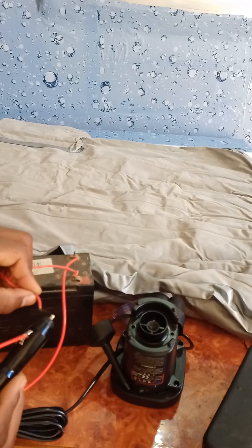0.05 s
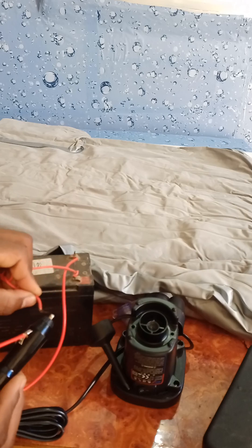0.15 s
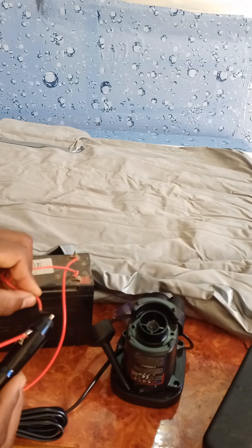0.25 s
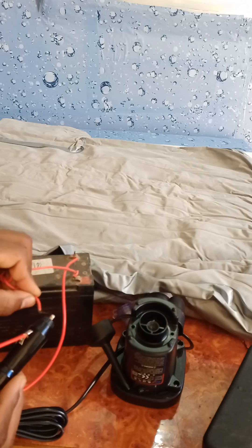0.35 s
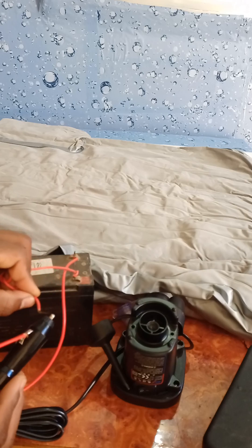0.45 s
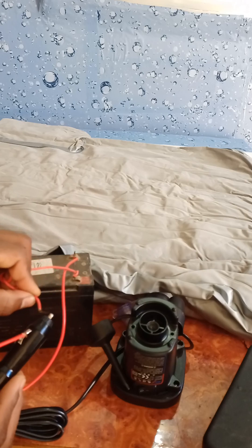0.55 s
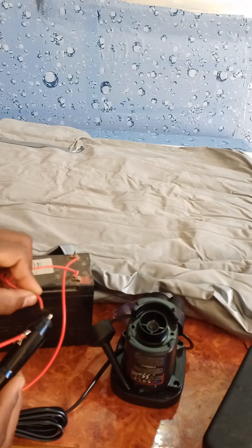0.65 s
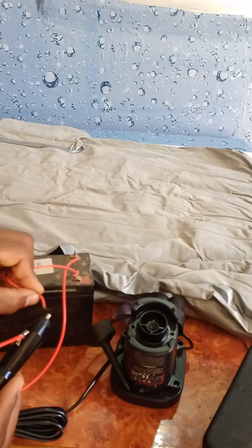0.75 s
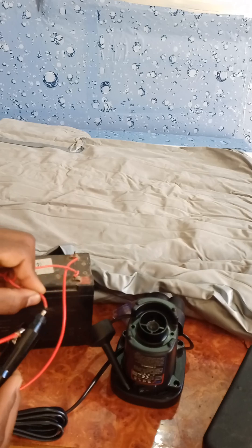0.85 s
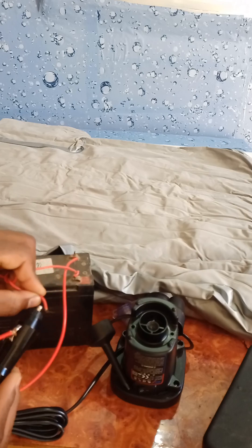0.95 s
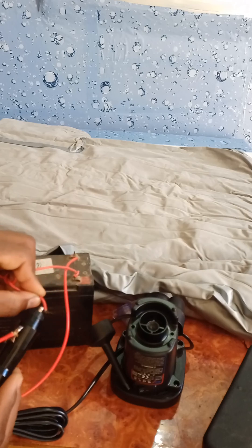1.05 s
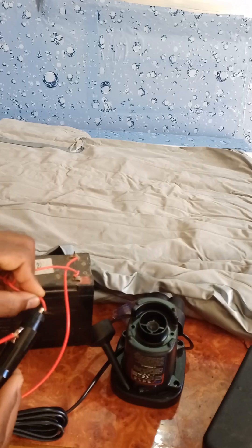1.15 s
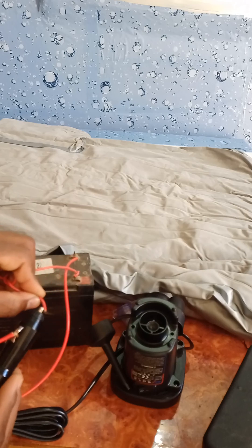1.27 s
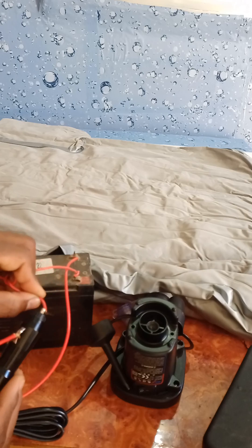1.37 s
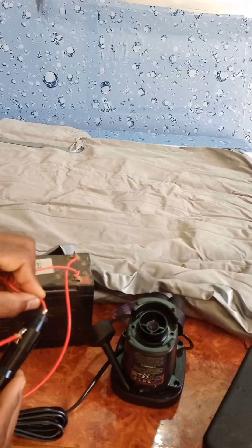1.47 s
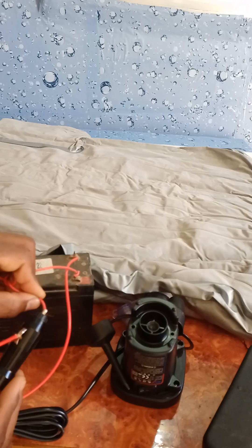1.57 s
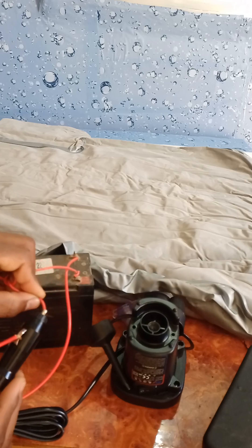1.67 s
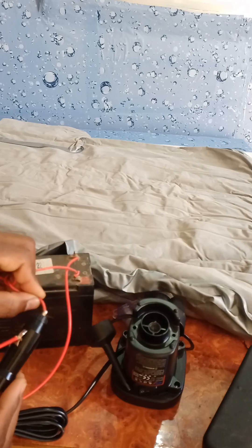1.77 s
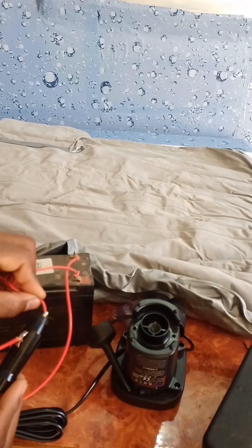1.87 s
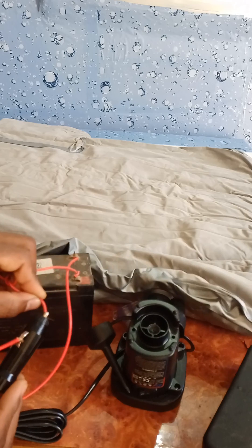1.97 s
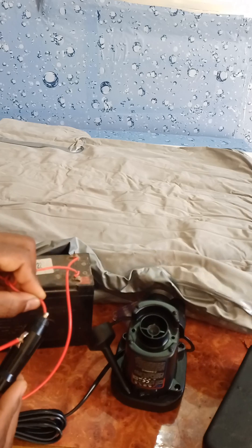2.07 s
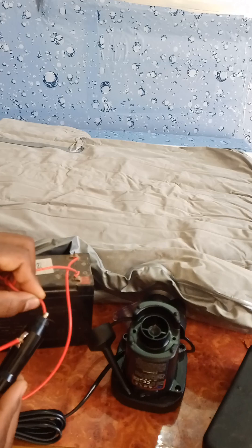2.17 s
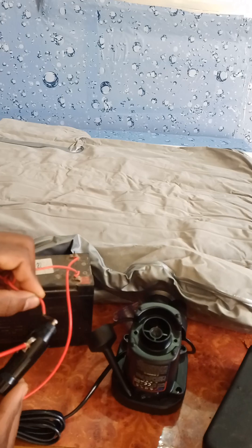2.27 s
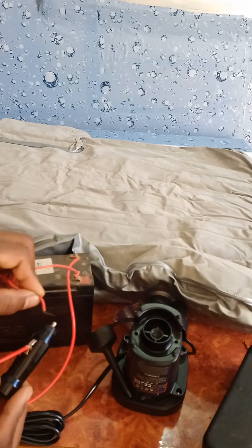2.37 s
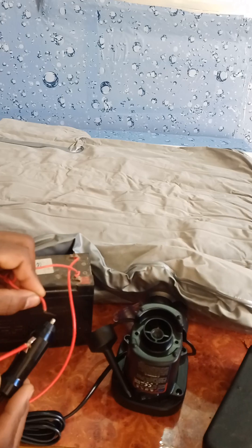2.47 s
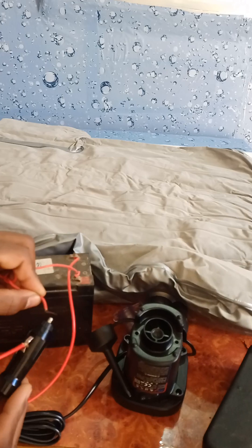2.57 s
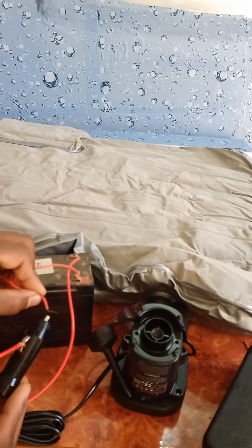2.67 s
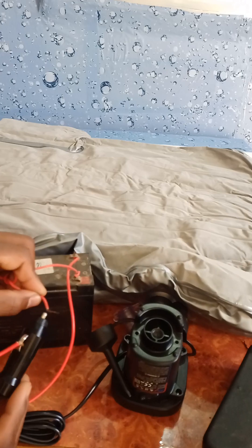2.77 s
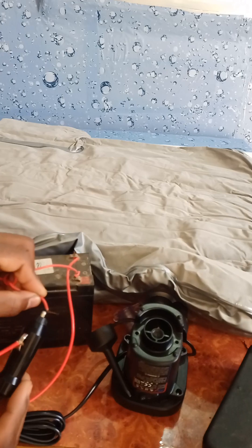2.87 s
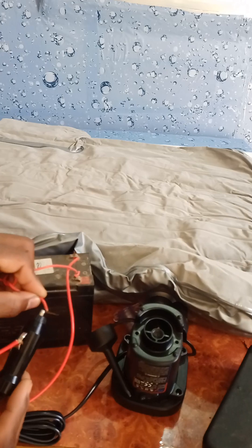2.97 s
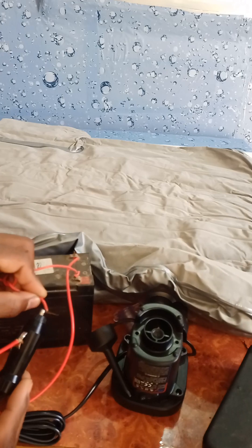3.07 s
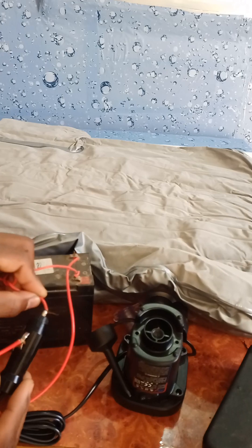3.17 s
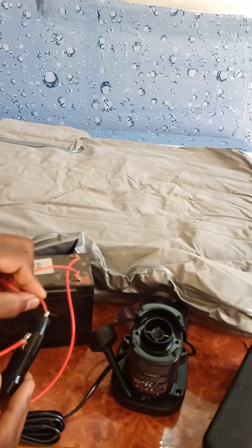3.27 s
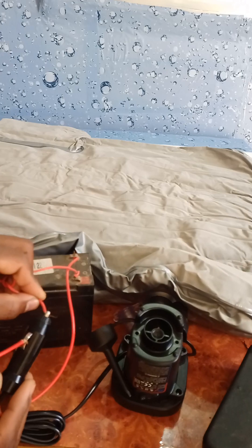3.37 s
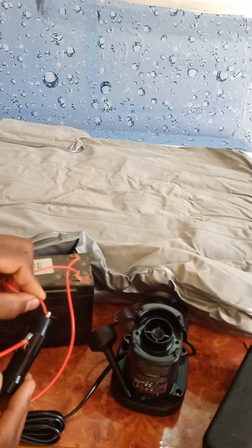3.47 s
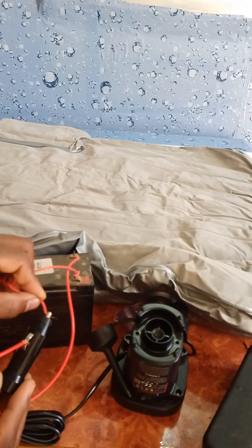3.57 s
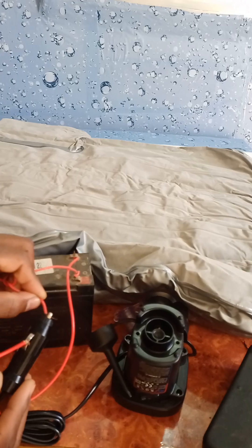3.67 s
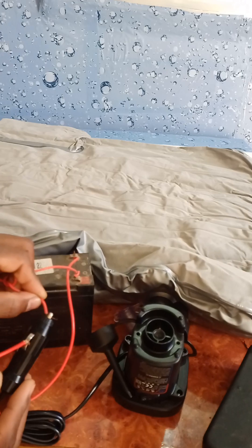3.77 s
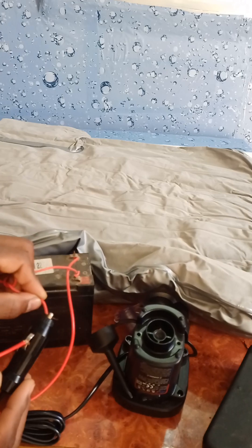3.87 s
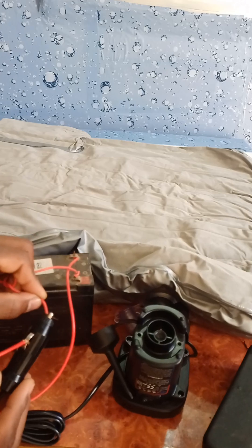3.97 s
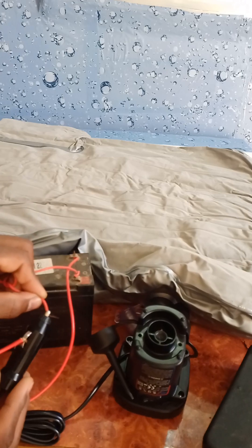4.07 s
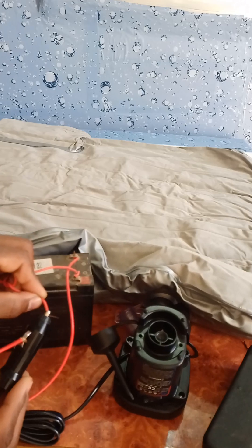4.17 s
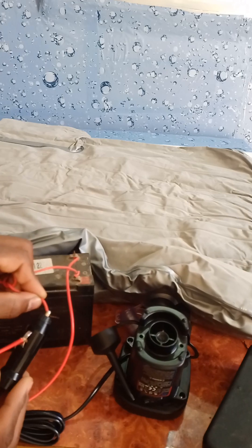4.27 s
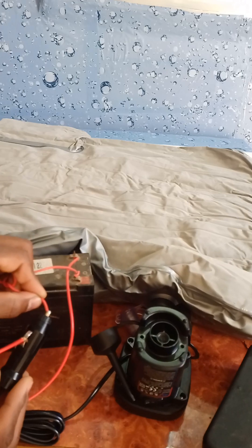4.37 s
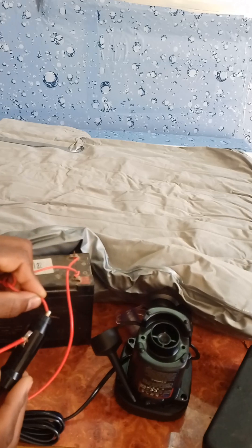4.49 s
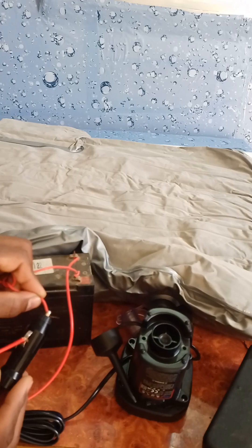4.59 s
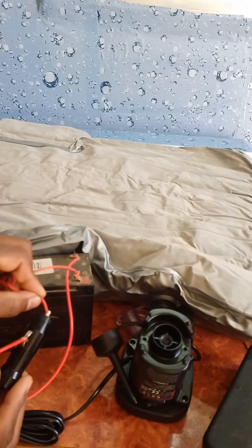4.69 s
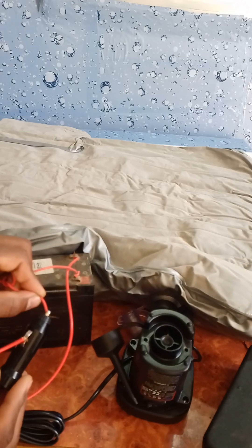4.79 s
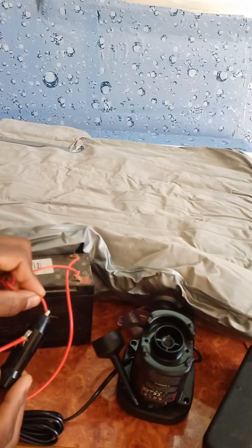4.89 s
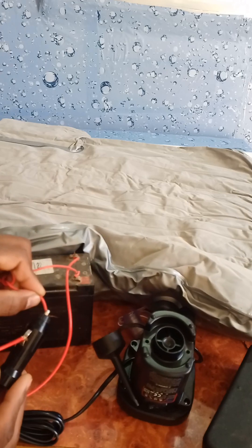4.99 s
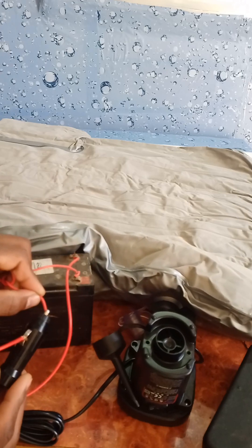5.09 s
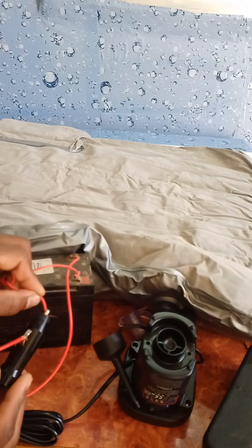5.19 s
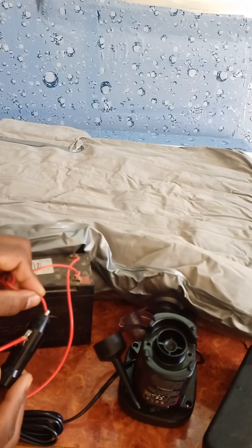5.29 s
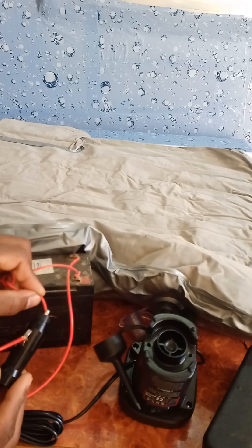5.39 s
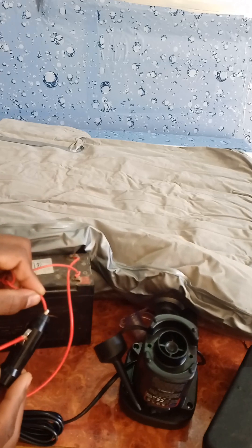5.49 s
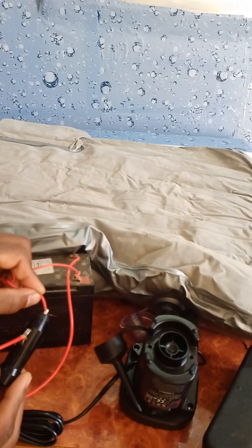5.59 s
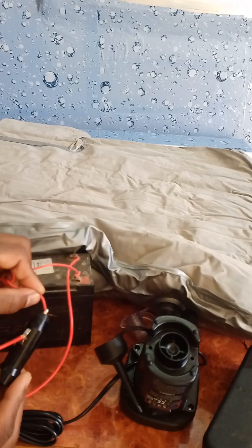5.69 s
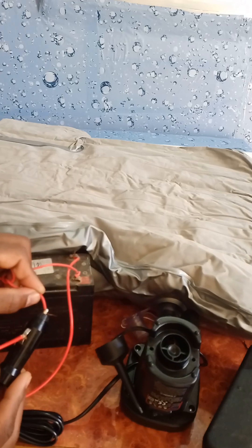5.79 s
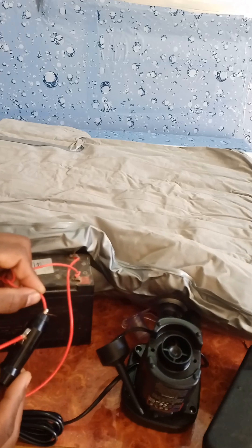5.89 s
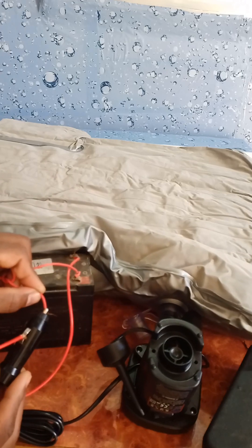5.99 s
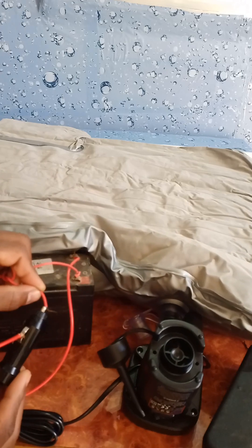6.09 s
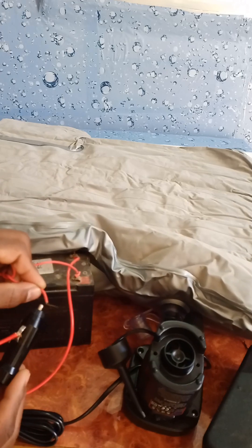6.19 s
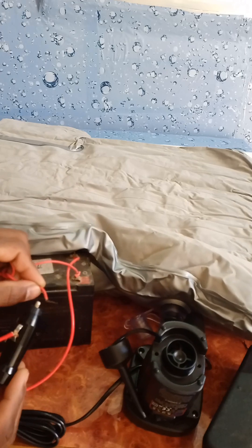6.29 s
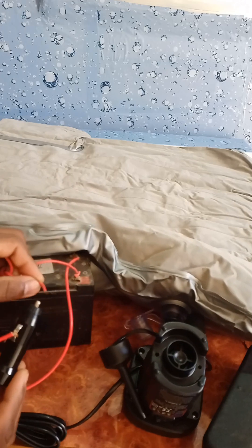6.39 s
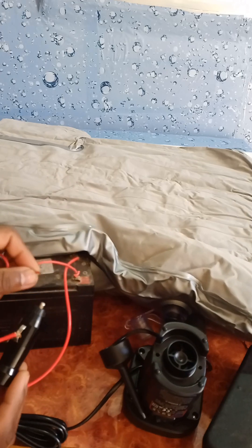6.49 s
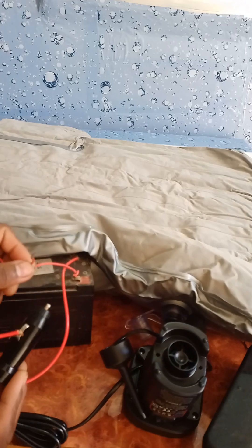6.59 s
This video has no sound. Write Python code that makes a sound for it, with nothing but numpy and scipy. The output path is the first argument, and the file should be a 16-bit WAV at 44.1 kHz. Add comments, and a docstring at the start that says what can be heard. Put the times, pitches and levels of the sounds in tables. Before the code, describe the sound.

Near-silence with dull handling rustle and a couple of dry clicks, then a compact air pump surges on: rising whine, hissing airflow, brush buzz. Power cuts and the pitch glides down, growing buzzier and quieter, before it climbs again and runs on with slight case vibration. Close phone microphone, modest bedroom reflections, final spin-down just starting.

```python
"""A small battery air pump blows into a mattress in a bedroom, close to a phone.
A wire is held to its plug: the motor spins up, coasts down, spins up again, runs, and coasts once more.
Six impeller blades whine over a noise rush of air; brushes buzz, and the unbalanced shaft shakes and
rattles the case on the table. All the pump's tones are sines locked to one computed shaft angle.
Before the start, filtered noise rustles as hands move the leads, and decaying sines tick from the plug."""
import sys
import numpy as np
from scipy import signal
from scipy.fft import rfft, irfft
from scipy.io import wavfile
from scipy.ndimage import uniform_filter1d

SR = 44100
rng = np.random.default_rng(int(sys.argv[2]) if len(sys.argv) > 2 else 0)


def master_out(mix):
    """Clip the mix to full scale and print it as 16-bit PCM to the path in sys.argv[1]."""
    frames = np.transpose(np.atleast_2d(mix))
    ceiling = np.clip(frames, -1, 1)
    pcm = np.round(ceiling * 32767).astype(np.int16)
    wavfile.write(sys.argv[1], SR, pcm)


N = 292855
TIME = np.arange(N) / SR
BINS_HZ = np.maximum(np.arange(N // 2 + 1) * SR / N, 1)
START_S = 1.46  # the pump first sounds
FULL_SPEED_HZ = 336  # shaft turns a second
POLES = 5  # motor poles
TOP_HZ = 15700  # upper limit of the phone

# Tone of the air stream. Each row: frequency in Hz, relative level in dB per Hz.
AIR_COLOUR = [(50.0, -26.5), (110.0, -22.5), (190.0, -9.5), (300.0, -6.5), (560.0, 5), (780.0, -2.5),
              (1000.0, 4.5), (1650.0, 2.5), (2250.0, -7.5), (3500.0, -16.5), (5200.0, -14.5), (8300.0, -23),
              (11000.0, -21), (15500.0, -42.5)]
# Resonances of the impeller housing and intake. Each row: centre in Hz, width in Hz, lift in dB.
HOUSING_RESONANCES = [(2942, 505, 12), (4143, 940, 9), (4687, 290, 12.5), (6080, 1360, 12.5),
                      (7400, 950, 9), (9130, 810, 9.5), (9924, 440, 7)]


def undb(db):
    """Decibels to gain."""
    return 10 ** (np.asarray(db) / 20)


def curve(rows, axis=1):
    """One column of a table, joined by straight lines in time."""
    rows = np.array(rows)
    return np.interp(TIME, rows[:, 0], rows[:, axis])


def colour(points, hz):
    """Level in dB of a spectrum at the given frequencies, joined along log frequency."""
    point_hz, db = np.transpose(points)
    return np.interp(np.log(hz), np.log(point_hz), db)


def lift_db(hz, resonances):
    """How many dB a set of bell-shaped resonances lifts a frequency."""
    return sum(db * np.exp(-(2 * (hz - centre) / width) ** 2) for centre, width, db in resonances)


def noise(spectrum_db):
    """Noise of a given spectrum, rms 1."""
    x = irfft(rfft(rng.standard_normal(N)) * undb(spectrum_db), N)
    return x / x.std()


def split(x, hz, order=6):
    """The parts of a sound below and above a frequency, each with rms 1."""
    low = irfft(rfft(x) / (1 + (BINS_HZ / hz) ** order), N)
    high = x - low
    return low / low.std(), high / high.std()


def walk(rate_hz):
    """Smooth random movement: noise dulled above the given rate, spread 1."""
    return noise(-20 * np.log10(1 + (BINS_HZ / rate_hz) ** 4))


def line(angle, multiple, db, waver_db):
    """One multiple of the shaft rate; turbulence makes its level waver."""
    level = np.sqrt(2) * undb(db + waver_db * walk(35.7))
    return level * np.sin(multiple * angle + rng.uniform(0, 2 * np.pi))


def quiet_room(level_db=-72):
    """Steady coloured noise is the bed of the quiet room."""
    # Each row: frequency in Hz, relative level in dB per Hz.
    quiet_colour = [(25, -12), (100, 18), (200, 4), (380, 4), (780, -1.5), (2500, -7.5), (15000, -21)]
    return undb(level_db) * noise(colour(quiet_colour, BINS_HZ))


def hands(rub_db=-6.5, rustle_db=-19.0, grain_db=1.0, hold_db=-68.5, fade_s=0.08):
    """Dull rubbing and a faint uneven rustle as the leads are brought together."""
    # Tone of skin on leads. Each row: frequency in Hz, relative level in dB per Hz.
    hands_colour = [(40, -26), (190, -14), (360, 2), (470, -9), (700, -22.5), (1450, -25.5), (2900, -34),
                    (6300, -30.5), (14000, -50)]
    # Movements of the leads. Each row: start in seconds (mid-fade), length in seconds, relative level in dB.
    rubs = [(-.05, 0.32, -55), (.81, 0.3, -59), (1.214, 0.35, -61.5)]
    rub, rustle = split(noise(colour(hands_colour, BINS_HZ)), 2200)
    moves = 0
    for at, length, db in rubs:
        nearest_end = np.minimum(TIME - at, at + length - TIME)
        moves = moves + undb(db) * np.clip(nearest_end / fade_s + .5, 0, 1)
    # hands merely holding the leads keep a floor under the rubs
    effort = np.hypot(moves, undb(hold_db)) * (TIME < START_S)
    rustle = rustle * undb(rustle_db + grain_db * walk(120))
    return (undb(rub_db) * rub + rustle) * effort


def ticks(crack=0.82, crack_s=0.005, low_hz=3100, high_hz=10000):
    """Metal touches metal: a short dry scrape rings the plug."""
    # Touches of plug on wire. Each row: start in seconds, peak in dB, brightness in dB an octave.
    touches = [(1.0304, -38.5, -3), (1.083, -43, -15), (1.415, -62, -6), (1.4595, -50, 3)]
    # Ring of the plug. Each row: frequency in Hz, relative level in dB, t60 in seconds.
    plug = [(3480, -9, .018), (5330, 0, 0.0076), (6370, -7, .012), (9600, -10, 0.014)]
    out, t = np.zeros(N), TIME[:SR // 10]
    band = signal.butter(3, [low_hz, min(high_hz, TOP_HZ)], "band", fs=SR, output="sos")
    for at, peak_db, bright_db in touches:
        ring = 0
        for hz, db, t60 in plug:
            tilt_db = bright_db * np.log2(hz / plug[0][0])
            ring = ring + undb(db + tilt_db - 60 * t / t60) * np.sin(2 * np.pi * hz * t)
        scrape = signal.sosfilt(band, rng.standard_normal(len(t))) * np.exp(-t / crack_s)
        tick = (ring + crack * undb(bright_db) * scrape) * np.minimum(t / 0.00077, 1)
        i = int(at * SR)
        out[i:i + len(t)] += undb(peak_db) * tick / np.abs(tick).max()
    return out


def shaft(size=44):
    """Speed (Hz) and pull (0-1): powered, the motor drives towards top speed; drag and friction always brake."""
    # The wire is held to the plug. Each row: on in seconds, off in seconds.
    power_on = [(1.463, 2.368), (3.328, 6.227)]
    # Speed the battery can sustain against the air load. Each row: time in seconds, turns a second in Hz.
    top_speed = [(1.9, 342.0), (2.3, 335.2), (3.8, 339.6), (4.2, 334.6), (4.8, 337.6), (5.0, 339.9)]
    spin_up_s, air_drag_per_turn, friction_hz_per_s = .418, .00417, 56.8
    stall_hz_per_s = 1300  # acceleration that counts as full pull

    def losses(hz):
        """Braking in Hz per second: air drag grows with speed squared, bearing friction is constant."""
        return air_drag_per_turn * hz ** 2 + friction_hz_per_s

    times, hz, speeds = TIME[::size], 0., []
    for t, top in zip(times, curve(top_speed)[::size]):
        powered = any(on <= t < off for on, off in power_on)
        drive = (top - hz) / spin_up_s + losses(top) if powered else 0
        hz = max(0, hz + (drive - losses(hz)) * size / SR)
        speeds.append(hz)
    speed = np.interp(TIME, times, speeds)
    pull = np.clip(np.gradient(speed) * SR / stall_hz_per_s, 0, 1)
    return speed, uniform_filter1d(pull, SR // 50)


def air_stream(angle, speed, pull, rush_db=-26.0, choke_hz=235, rush_power=4.53, hiss_db=-27,
               hiss_power=3.52, idle_db=-22, pull_db=4, scrape_db=-43, scrape_s=0.11,
               crossover_hz=2200, chop=0.062, flutter_db=1.2):
    """A low rush grows until the nozzle chokes; hiss pulses with each turn; the first start adds a scrape."""
    # the air stream slackens as the mattress fills
    rush_fade_db_per_s, hiss_fade_db_per_s = 1.21, 0.83
    air = noise(colour(AIR_COLOUR, BINS_HZ) + lift_db(BINS_HZ, HOUSING_RESONANCES))
    rush, hiss = split(air, crossover_hz)
    pace, age = speed / FULL_SPEED_HZ, np.maximum(TIME - START_S, 0)
    flow = (speed / choke_hz) ** rush_power
    flow = flow / np.hypot(1, flow) * undb(rush_db - rush_fade_db_per_s * age)
    scrape = undb(scrape_db) * (age / scrape_s * np.exp(1 - age / scrape_s)) ** 2
    rush = rush * np.hypot(flow, scrape) * undb(flutter_db * walk(6.9))
    hiss = hiss * np.hypot(pace ** hiss_power, undb(idle_db) * pace)
    hiss = hiss * undb(hiss_db - hiss_fade_db_per_s * age + pull_db * pull + flutter_db * walk(33))
    return rush + hiss * (1 + chop * np.sin(angle))


def motor(angle, speed, pull, power=2.5, waver_db=4.0, torque_db=-25, case_hz=1470, case_width_hz=400,
          onset_hz=150):
    """Motor lines flare as they sweep the housing's resonances; the poles sing while the motor pulls hard."""
    # Low shaft multiples and upper blade harmonics.
    # Each row: multiple of the shaft rate, level in dB at full speed before resonance and waver.
    motor_lines = [(2, -44), (3, -42), (5, -39.5), (14, -61), (17, -56.5), (24, -52), (30, -51.5),
                   (36, -56.5), (42, -69)]
    lines = sum(line(angle, multiple, db + lift_db(multiple * speed, HOUSING_RESONANCES), waver_db)
                for multiple, db in motor_lines)
    off_tune = 2 * (POLES * speed - case_hz) / case_width_hz
    case = np.minimum(speed / onset_hz, 1) ** 2 / np.hypot(1, off_tune) ** 2
    pole_song = np.sqrt(np.abs(pull)) * case * line(angle, POLES, torque_db, waver_db)
    return lines * (speed / FULL_SPEED_HZ) ** power + pole_song


def brushes(angle, speed, pull, buzz_db=-60, pull_db=11, colour_share=0.76, pole_db=10, can_hz=6200,
            can_db=9, onset_hz=70, count=56):
    """Brushes tick over the commutator: shaft multiples, strongest at pole multiples, ring the motor's can."""
    out = 0
    coarse, patch_times = TIME[::64], TIME[::SR // 20]
    for k in range(2 * POLES, count):
        hz = k * speed[::64]
        ring_db = can_db * np.exp(-(8 * (hz / can_hz - 1)) ** 2)
        db = buzz_db + pole_db * (k % POLES == 0) + ring_db + pull_db * pull[::64]
        db = db + lift_db(hz, HOUSING_RESONANCES) / 2
        db = db + colour_share * colour(AIR_COLOUR, np.maximum(hz, 1))
        patchy_db = 4 * np.interp(coarse, patch_times, rng.standard_normal(len(patch_times)))
        gain = undb(db + patchy_db) / (1 + (hz / can_hz) ** 10)
        out = out + np.interp(TIME, coarse, gain) * np.sin(k * angle + rng.uniform(0, 2 * np.pi))
    # the ticking fades more slowly than the air, so it stands out as the motor coasts
    return out * speed / FULL_SPEED_HZ * np.minimum(speed / onset_hz, 1) ** 2


def impeller(angle, speed, whine_db=-0.45, waver_db=1.0, glide_waver_db=3.5, onset_hz=125):
    """Blades passing the outlet whine in three harmonics that flare in its resonances, unsteady when slow."""
    blades = 6
    # Each row: multiple of the blade rate, base level in dB, power of speed.
    whine = [(1, -27, 2.45), (2, -38.6, 0.046), (3, -37.5, 3.06)]
    # Outlet resonances the whine sweeps through. Each row: centre in Hz, width in Hz, lift in dB.
    outlet = [(1235, 285, 6.5), (1663, 140, 7), (2895, 220, 13), (4606, 400, 16), (5350, 150, 3),
              (5940, 410, 10.5)]
    # Slow swells of the whine. Each row: time in seconds, then first, second and third harmonic in dB.
    swells = [(1.68, 9.5, -8.0, -3.5), (2.2, 2.5, 7.0, -1.5), (2.9, 1.5, -18, -7), (3.5, 2.5, -8.5, -1.5),
              (3.95, 3, 1.5, 2.5), (4.35, -4.5, -6.5, -8.5), (4.7, 5.5, -3, -7), (5.05, -3.0, 9.5, 0.5),
              (5.45, -2.5, 15, 5.5), (5.85, -4, 12, 3), (5.97, -0.5, 3, 3.5), (6.2, 1.5, 7, 0.5),
              (6.45, 6.5, -15.5, 0)]
    out, pace = 0, np.maximum(speed, 1) / FULL_SPEED_HZ
    unsteady_db = waver_db + glide_waver_db * np.clip(2 * (1 - pace), 0, 1)
    for column, (harmonic, db, power) in enumerate(whine, 1):
        multiple = blades * harmonic
        level_db = whine_db + db + lift_db(multiple * speed, outlet) + curve(swells, axis=column)
        out = out + pace ** power * line(angle, multiple, level_db, unsteady_db)
    return out * np.minimum(speed / onset_hz, 1) ** 5


def shaking(angle, speed, pull, mount_hz=223, width_hz=45, shake_db=-33, pull_db=-5, slip_hz=170,
            rattle_hz=241, rattle_span_hz=13):
    """Imbalance grows with speed squared, rocks the case once the feet slip, and rattles near resonance."""
    # How firmly the case sits on the table. Each row: time in seconds, lift in dB.
    contact = [(4.8, 8), (4.95, 16), (6.22, 15), (6.42, 7)]
    # Rattle of the case. Each row: multiple of the shaft rate, relative level in dB.
    rattle_lines = [(2, -37), (3, -32.5), (4, -37.5)]
    feet = 1 / (1 + 1j * (BINS_HZ / mount_hz - mount_hz / BINS_HZ) * mount_hz / width_hz) ** 2
    force = (speed / mount_hz) ** 2 * np.minimum(speed / slip_hz, 1) ** 10
    hum = irfft(rfft(force * line(angle, 0.99, shake_db, waver_db=2.0)) * feet, N)
    loose = np.exp(-((speed - rattle_hz) / rattle_span_hz) ** 2)
    rattle = sum(line(angle, multiple, db, waver_db=2.0) for multiple, db in rattle_lines)
    # the case shakes less while the motor pulls
    return (hum + loose * rattle) * undb(curve(contact) + pull_db * pull)


def pump():
    """All the pump's sounds follow one slightly unsteady shaft."""
    speed, pull = shaft()
    speed = speed * (1 + .0003 * walk(30))
    angle = 2 * np.pi * np.cumsum(speed) / SR
    running = np.clip((TIME - START_S) / 0.0091, 0, 1)
    body = motor(angle, speed, pull) + brushes(angle, speed, pull) + shaking(angle, speed, pull)
    return running * (air_stream(angle, speed, pull) + impeller(angle, speed) + body)


def room(x, count=16):
    """Mirror images of the source in walls, floor and ceiling give its echoes."""
    # room size and positions in metres
    room_size, pump_at, phone_at = (3.53, 4.31, 2.74), (1.1, 1.5, .2), (1.18, 1.25, .6)
    sound_speed, wall_reflection, echo_share = 343, .86, .7  # m/s, gain per bounce, overall gain
    n = np.mgrid[-count:count + 1, -count:count + 1, -count:count + 1].reshape(3, -1).T
    images = n * np.array(room_size) + np.where(n % 2, np.subtract(room_size, pump_at), pump_at)
    far, bounces = np.linalg.norm(images - phone_at, axis=1), np.abs(n).sum(axis=1)
    lag = ((far - far.min()) / sound_speed * SR).astype(int)
    size = echo_share * (-wall_reflection) ** bounces * far.min() / far
    # direct sound is left out; the mattress swallows the nearest bounce
    echoes = np.bincount(lag, size * (far > 2 * far.min()))
    return signal.fftconvolve(x, echoes)[:N]


def scatter(x, t60_s=0.95, scatter_db=-12):
    """Furniture scatters sound into a short diffuse noise tail, which trails behind gliding tones."""
    t = TIME[:SR // 2]
    tail = rng.standard_normal(len(t)) * undb(-60 * t / t60_s) * np.minimum(t / 0.006, 1)
    return undb(scatter_db) * signal.fftconvolve(x, tail / np.linalg.norm(tail))[:N]


def scene(tick_echo_db=-10):
    """Pump, hands and ticks in a quiet room; the ticks are nearer, so drier."""
    machine, plug_ticks = pump(), ticks()
    spread = machine + undb(tick_echo_db) * plug_ticks
    direct = machine + plug_ticks + hands()
    return (direct + room(spread) + scatter(spread) + quiet_room())[None]


def record(dry, low_cut_hz=55):
    """The phone loses the deepest bass and cuts the top."""
    thin = signal.sosfilt(signal.butter(2, low_cut_hz, "high", fs=SR, output="sos"), dry)
    return signal.sosfilt(signal.ellip(10, .1, 80, TOP_HZ, fs=SR, output="sos"), thin)


dry = scene()
out = record(dry)
master_out(out)
```